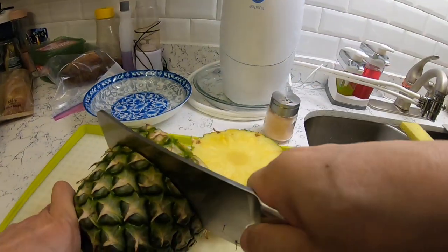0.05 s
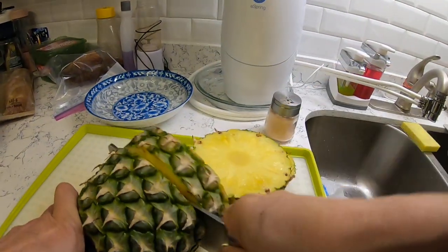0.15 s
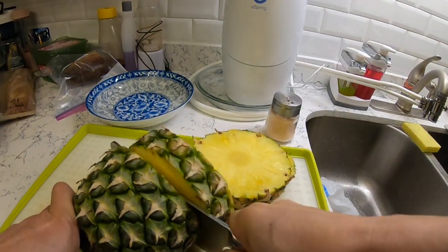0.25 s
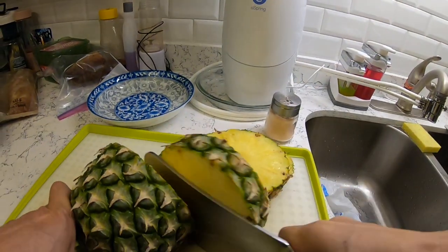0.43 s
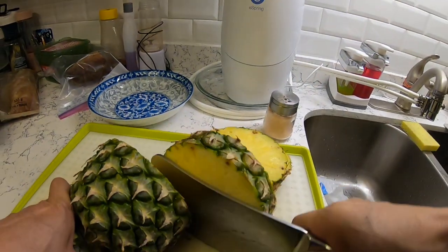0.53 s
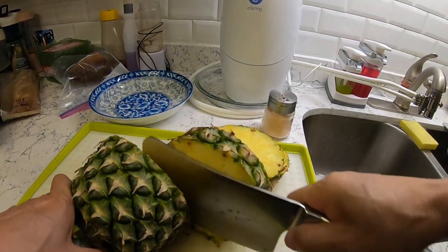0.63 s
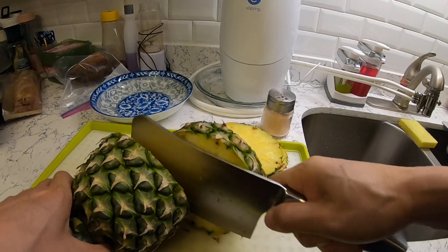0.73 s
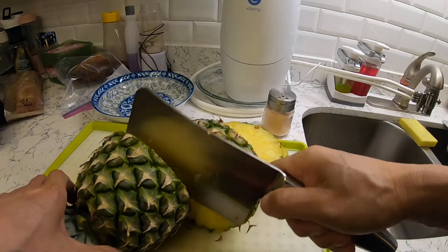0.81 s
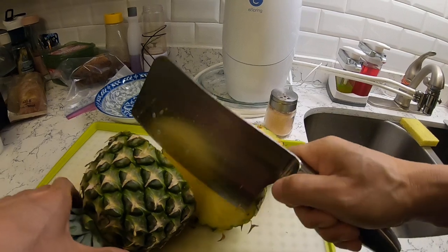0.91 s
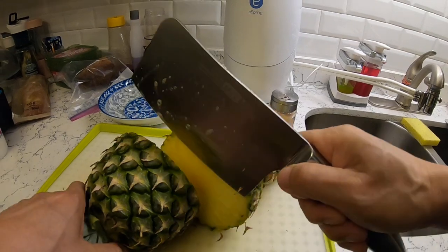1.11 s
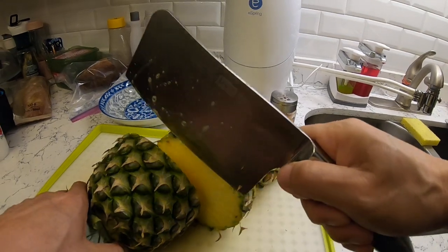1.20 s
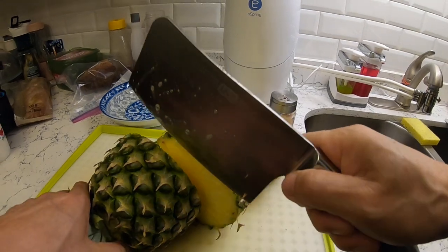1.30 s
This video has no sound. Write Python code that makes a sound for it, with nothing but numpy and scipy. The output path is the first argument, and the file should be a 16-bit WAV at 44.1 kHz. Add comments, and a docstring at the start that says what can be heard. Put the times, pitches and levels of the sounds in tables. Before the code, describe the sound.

A cleaver cuts a pineapple: faint scrape, a fast swelling crunch, one very loud hollow knock on a plastic board, then quiet wet sliding and tiny smacks. Close microphone in a small, reflective kitchen.

```python
"""Cleaver through a pineapple

A cleaver cuts a pineapple on a plastic cutting board in a tiled kitchen. The edge scrapes the skin and
tears the fibres ever louder (random bursts of noise), then knocks loudly on the board (excited modes).
The blade is drawn back along the wet flesh with small smacks and bumps (banded noise and softer blows).
Decaying noise forms the reverberation; rumble, room noise and a faint hum lie beneath."""
import sys
import numpy as np
from scipy import signal
from scipy.fft import rfft, irfft
from scipy.io import wavfile

SR = 44100
rng = np.random.default_rng(int(sys.argv[2]) if len(sys.argv) > 2 else 0)


def output_pcm(signal):
    """Save a mono or channel-first signal as 16-bit PCM at the path in sys.argv[1].

    Samples are clipped to [-1, 1] before scaling.
    """
    pcm = np.clip(np.atleast_2d(signal).T, -1, 1) * 32767
    wavfile.write(sys.argv[1], SR, np.round(pcm).astype(np.int16))


N = 59535  # samples
TIME = np.arange(N) / SR  # s

# Fibres tearing as the blade drives down: time_s, relative_level_db
CUT_LEVEL = [(.15, -67.5), (.165, -50.5), (.18, -42.5), (.2, -38.5), (.226, -34), (.238, -28), (.259, -21),
             (.265, -27.5), (.273, -46)]
# Spectral density of the tearing: frequency_hz, relative_density_db (per Hz)
CUT_COLOUR = [(200, -29.5), (600, -13), (1150, 6.5), (1700, -13.5), (2600, -6), (3700, -10.5),
              (5000, -15.5), (9500, -20.5), (11300, -34), (15500, -49.5)]
# Fruit body groaning as the blade wedges it open: time_s, level_db
WEDGE_LEVEL = [(.178, -57), (.19, -44), (.227, -41.5), (.237, -24), (.26, -29.5), (.27, -37)]
# Spectral density of the groan: frequency_hz, relative_density_db (per Hz)
WEDGE_COLOUR = [(60, -19), (120, -14), (300, 7.5), (620, -2.5), (900, -13), (2000, -47.5)]
# Steel blade resonances, damped by the fruit: frequency_hz, width_hz, boost_db
BLADE_MODES = [(2340, 15, -7), (2432, 29, -5), (2880, 110, -5)]
# Blows on the board: start_s, peak_db, low_edge_hz, high_edge_hz, ringing_drive_db
KNOCKS = [(.2647, .5, 330, 840, -25), (.2689, -6, 100, 500, -23.5), (.2649, -10, 750, 1650, -28),
          (.002, -40, 350, 800, -50), (.076, -44, 700, 2500, -62), (.128, -52, 150, 260, -60),
          (.16, -44, 950, 1400, -64), (.482, -43, 350, 800, -60), (.604, -36, 240, 620, -53),
          (.606, -46, 166, 192, -62), (.606, -44, 640, 730, -64), (1.1565, -48, 170, 750, -63),
          (1.157, -52, 1050, 1450, -70), (1.252, -57, 150, 195, -70), (1.281, -54, 150, 310, -62)]
# Modes of board and fruit: frequency_hz, relative_level_db, t60_s
BOARD_MODES = [(118, 0, .31), (172, .5, .28), (237, -7, .28), (269, 5.5, .27), (316, 1, .27),
               (349, -.5, .26), (409, -9.5, .27), (461, -9, .33), (549, -7.5, .3), (602, -3.5, .27),
               (712, -13, .28), (888, -14, .3), (942, -16, .3), (1005, -14, .25), (1155, -9.5, .25)]
# Snapping fibres and wet smacks: start_s, relative_peak_db, centre_hz, width_octaves, decay_s
SNAPS = [(0.1884, -19.5, 7220, 0.58, 0.0039), (.2305, -46, 3000, 1.3, 0.0021),
         (0.2423, -17.5, 7000, 0.77, 0.0053), (0.2578, -13.5, 2730, 0.62, 0.004),
         (0.2746, -22, 2110, 0.99, 0.0017), (.329, -30, 3840, 0.77, 0.0018),
         (.3448, -44, 8900, .4, 0.00066), (.349, -33.5, 5500, 1.3, 0.00046), (.355, -39, 9000, 0.3, 0.0027),
         (.3648, -26.5, 7400, 0.77, 0.0023), (0.601, -38.5, 3200, 0.41, 0.012),
         (.669, -38, 3690, 1.45, 0.012), (.679, -32.5, 4847, 1.4, .0089), (0.844, -39.5, 4500, 1.73, 0.032),
         (0.855, -37.5, 2436, .25, 0.0048), (0.8903, -38, 4136, 1.3, 0.00097),
         (0.897, -36, 4860, 1.1, 0.0026), (0.898, -44, 950, 0.31, 0.0061),
         (0.909, -33.5, 4685, 1.55, 0.0021), (0.975, -43, 3040, 2.5, .003),
         (1.0035, -44, 2940, 0.47, 0.0024), (1.172, -48.5, 4405, 1.8, .013),
         (1.2122, -37, 3500, .35, 0.0018)]
# Edge scraping the skin: time_s, level_db
SCRAPE_LEVEL = [(0, -56.5), (.02, -52), (.05, -51), (.115, -53), (.135, -67), (.155, -77)]
# Spectral density of the scrape: frequency_hz, relative_density_db (per Hz)
SCRAPE_COLOUR = [(300, -4), (1400, 1.5), (2000, -6), (3700, -5.5), (5000, -13), (7400, -1), (9500, -11.5),
                 (11500, -23), (16000, -39.5)]
# Wet flesh sliding on the blade: time_s, relative_level_db
SLIDE_LEVEL = [(.28, -66), (.36, -51.5), (.42, -54.5), (.52, -51.5), (.59, -54), (.68, -60.5), (.71, -65),
               (.815, -64), (.845, -54.5), (.875, -62.5), (.91, -55.5), (.94, -59), (.985, -58),
               (1.03, -77.5), (1.095, -59.5), (1.125, -70.5), (1.185, -60.5), (1.24, -79.5), (1.29, -61),
               (1.35, -88.5)]
# Spectral density of the slide: frequency_hz, relative_density_db (per Hz)
SLIDE_COLOUR = [(150, -14), (500, 0.5), (1100, 6), (1900, -1.5), (3200, -0.5), (5500, -2), (9300, -7.5),
                (11500, -25), (16000, -28)]
# Kitchen reverberation by octave band: centre_hz, relative_level_db, t60_s
ROOM_BANDS = [(60.2, -14, .7), (135, -22, .5), (252.2, -15, .32), (464.8, -9, .55), (1080, -7.5, .58),
              (1895, -6.5, .57), (4000, -14, .24), (7827, -19.5, .14), (14000, -24, .14)]
# Left-right correlation of the reverberation: frequency_hz, correlation (0-1)
ROOM_LIKENESS = [(100, 0.95), (250, 0.94), (500, 0.9), (1000, 0.18), (2500, 0.06), (8000, 0.06)]
# Left-right correlation of direct sound and background noise: frequency_hz, correlation (0-1)
LIKENESS = [(25, 0.7), (70, 0.6), (250, .98), (900, 0.5), (1900, 0.4), (3800, 1), (7500, .05), (13000, .35)]
# Low rumble while the arm moves: time_s, level_db
RUMBLE_LEVEL = [(0, -38), (.04, -47), (.11, -61), (.15, -51), (.23, -37.5), (.29, -37.5), (.34, -37),
                (.45, -58.5), (.68, -61.5), (.8, -88), (1.22, -75.5), (1.3, -59), (1.35, -72)]
# Spectral density of the rumble: frequency_hz, relative_density_db (per Hz)
RUMBLE_COLOUR = [(10, -12.5), (22, -3.5), (35, -2.5), (60, -10.5), (110, -19.5), (300, -57), (1000, -86.5)]
# Spectral density of the room noise: frequency_hz, relative_density_db (per Hz)
FLOOR_COLOUR = [(25, -2.5), (60, -13.5), (105, -17.5), (170, 3), (450, -6), (1000, -16.5), (3200, -11.5),
                (8000, -16.5), (12000, -44.5), (16000, -53)]

FLOOR_DB, HUM_DB, HUM_HZ = -67.5, -74.5, 498  # both levels are rms
ROOM_ONSET_S = 0.0043
CUTOFF_HZ = 15800


def from_db(db):
    """Logarithmic level: 20 dB is a tenfold amplitude."""
    return 10 ** (np.asarray(db) / 20)


def rms_one(x):
    """Effective value: divide by the root mean square."""
    return x / np.sqrt(np.mean(x ** 2) + 1e-20)


def level(curve):
    """Amplitude envelope: gain interpolated in decibels over time."""
    return from_db(np.interp(TIME, *np.transpose(curve)))


def stroke(curve):
    """Bounded contact: a level curve with fast exponential fades outside its end points."""
    before_s = curve[0][0] - TIME
    after_s = TIME - curve[-1][0]
    outside_s = np.maximum(np.maximum(before_s, after_s), 0)
    return level(curve) * np.exp(-outside_s / 0.003)


def at_hz(points, hz):
    """Logarithmic pitch scale: interpolate a table along log frequency."""
    table_hz, value = np.transpose(points)
    return np.interp(np.log(hz + 1e-6), np.log(table_hz), value)


def bins_hz():
    """Discrete spectrum: bin frequencies of a transform zero-padded to 2 N."""
    return np.arange(N + 1) * SR / (2 * N)


def colour(x, spectrum):
    """Linear filtering: weight the spectrum smoothly, then scale to rms 1."""
    shaped = rfft(x, 2 * N) * from_db(at_hz(spectrum, bins_hz()))
    return rms_one(irfft(shaped)[..., :N])


def spread(pair, likeness=LIKENESS):
    """Interchannel coherence: mix unrelated mid and side to a set correlation at each frequency."""
    alike = np.clip(at_hz(likeness, bins_hz()), -1, 1)
    mid, side = rfft(pair, 2 * N) * np.sqrt([1 + alike, 1 - alike])
    return irfft(np.array([mid + side, mid - side]))[:, :N]


def band(x, low_hz, high_hz, order=2):
    """Band limitation: a causal Butterworth band-pass."""
    high_hz = min(high_hz, .45 * SR)
    low_hz = min(low_hz, high_hz / 1.05)
    sos = signal.butter(order, [low_hz, high_hz], "band", fs=SR, output="sos")
    return signal.sosfilt(sos, x + 1e-18)


def click(start_s):
    """Impulsive force: a single unit sample."""
    return 1.0 * (np.arange(N) == max(int(start_s * SR), 0))


def crackle(per_s, size_db, grain_s, hiss):
    """Random bursting of cells: decaying noise grains of uneven size over a smooth hiss."""
    happens = rng.random(N) < per_s / SR
    sizes = from_db(size_db * np.minimum(rng.exponential(1, N), 3.5)) * happens
    # power decays twice as fast as amplitude
    power = signal.lfilter([1], [1, -np.exp(-2 / (grain_s * SR))], sizes ** 2 + 1e-18)
    envelope = np.sqrt(power / power.mean() + hiss ** 2)  # hiss is relative to the grains' rms
    return spread(rng.standard_normal((2, N)) * envelope)


def blade(x):
    """Resonance: the blade's short modes reinforce whatever rubs along it."""
    resonance = 0
    for hz, width_hz, boost_db in BLADE_MODES:
        b, a = signal.iirpeak(hz, hz / width_hz, fs=SR)
        resonance = resonance + from_db(boost_db) * signal.lfilter(b, a, x)
    return x + resonance


def cut():
    """Fracture noise: a dense crunch swells through the blade, with a low groan of the wedged body."""
    fibres = crackle(per_s=1800, size_db=3, grain_s=.00035, hiss=.4)
    tearing = blade(stroke(CUT_LEVEL) * colour(fibres, CUT_COLOUR))
    groan = stroke(WEDGE_LEVEL) * colour(fibres, WEDGE_COLOUR)
    return from_db(1.5) * tearing + groan


def knocks():
    """Impact and modal ringing: each short damped thud excites the board modes in its band."""
    thuds, strikes, ringing = np.zeros((3, N))
    for start_s, peak_db, low_hz, high_hz, drive_db in KNOCKS:
        thud = -band(click(start_s), low_hz, high_hz, order=3)
        thuds += from_db(peak_db) * thud / np.abs(thud).max()
        strikes += from_db(drive_db) * thud
    for hz, mode_db, t60_s in BOARD_MODES:
        radius = from_db(-60 / (t60_s * SR))  # decay per sample
        angle = 2 * np.pi * hz / SR
        poles = [1, -2 * radius * np.cos(angle), radius ** 2]
        ringing += from_db(mode_db) * signal.lfilter([0, np.sin(angle)], poles, strikes + 1e-18)
    return thuds + ringing


def snaps():
    """Sudden release: single fibres and juice films let go as short bursts in their own bands."""
    out = np.zeros((2, N))
    for start_s, peak_db, hz, octaves, decay_s in SNAPS:
        age_s = TIME - start_s
        decay = (age_s >= 0) * np.exp(-np.abs(age_s) / decay_s)
        half_width = 2 ** (octaves / 2)
        burst = band(rng.standard_normal((2, N)) * decay, hz / half_width, hz * half_width, order=3)
        out += from_db(peak_db) * burst / np.abs(burst).max(axis=1, keepdims=True)
    return from_db(-11.5) * spread(out)


def skin_scrape():
    """Friction noise: the edge hisses across the tough skin."""
    grains = crackle(per_s=1700, size_db=1.5, grain_s=0.00046, hiss=0.97)
    return stroke(SCRAPE_LEVEL) * colour(grains, SCRAPE_COLOUR)


def wet_slide():
    """Wet friction: juice crackles on the resonant blade as it is drawn out of the cut."""
    juice = crackle(per_s=450, size_db=3, grain_s=.0007, hiss=1.1)
    return from_db(-2.0) * blade(stroke(SLIDE_LEVEL) * colour(juice, SLIDE_COLOUR))


def kitchen(x):
    """Diffuse reverberation: reflections from tiles and worktop decay at a rate set for each octave band."""
    response = np.zeros((2, N))
    for hz, band_db, t60_s in ROOM_BANDS:
        noise = band(rng.standard_normal((2, N)), hz / np.sqrt(2), hz * np.sqrt(2))
        tail = noise * from_db(-60 * TIME / t60_s)
        tail *= 1 - np.exp(-(TIME / ROOM_ONSET_S) ** 2)  # gradual onset
        energy = np.sum(tail ** 2, axis=1, keepdims=True)
        bandwidth = hz / np.sqrt(2) / SR  # as a fraction of the sample rate
        response += from_db(band_db) * tail * np.sqrt(bandwidth / energy)
    return signal.fftconvolve(x, spread(response, ROOM_LIKENESS), axes=1)[:, :N]


def background():
    """Stationary noise and a pure tone: room noise and a thin appliance hum, with a varying low rumble."""
    rumble = level(RUMBLE_LEVEL) * colour(spread(rng.standard_normal((2, N))), RUMBLE_COLOUR)
    floor = from_db(FLOOR_DB) * colour(spread(rng.standard_normal((2, N))), FLOOR_COLOUR)
    hum = from_db(HUM_DB) * np.sqrt(2) * np.sin(2 * np.pi * HUM_HZ * TIME)
    return rumble + floor + hum


def scene():
    """Superposition: direct and reflected knife work add; the blade is further right when drawn out."""
    cut_pan_db, slide_pan_db = .2, 1.1  # subtracted on the left, added on the right
    cutting = (skin_scrape() + cut() + snaps()) * from_db([[-cut_pan_db], [cut_pan_db]])
    drawing = wet_slide() * from_db([[-slide_pan_db], [slide_pan_db]])
    knife = cutting + drawing + knocks()
    return knife + kitchen(knife) + background()


def record(dry):
    """Clipping and band limitation: peaks are cut off at 0.95, then a steep low-pass removes the top."""
    lowpass = signal.ellip(10, .1, 90, CUTOFF_HZ, fs=SR, output="sos")
    return signal.sosfilt(lowpass, np.clip(dry, -.95, .95))


dry = scene()
out = record(dry)
output_pcm(out)
```